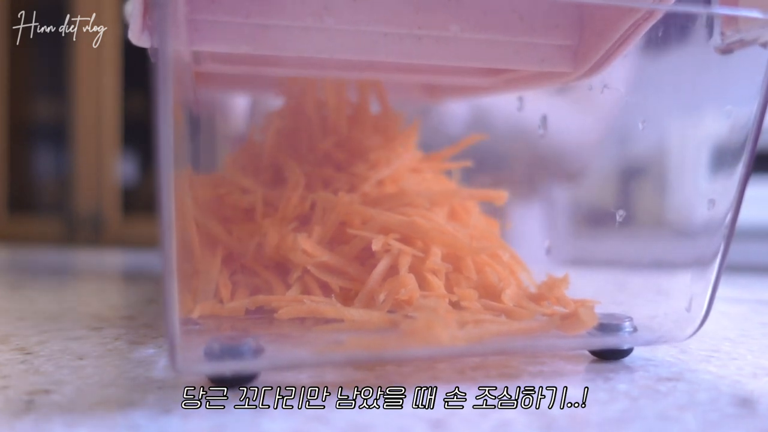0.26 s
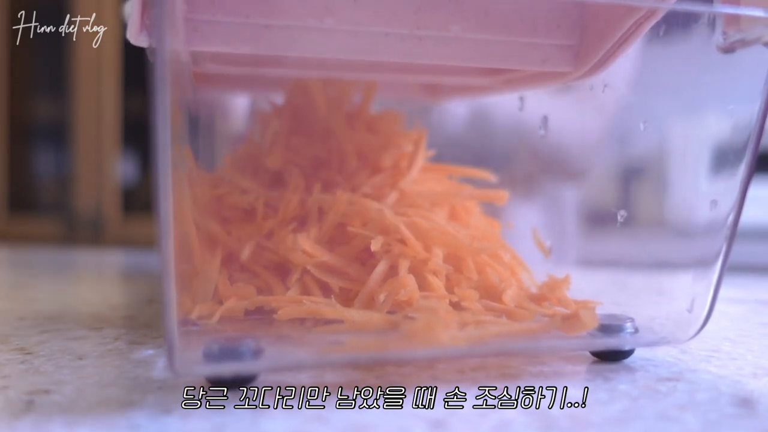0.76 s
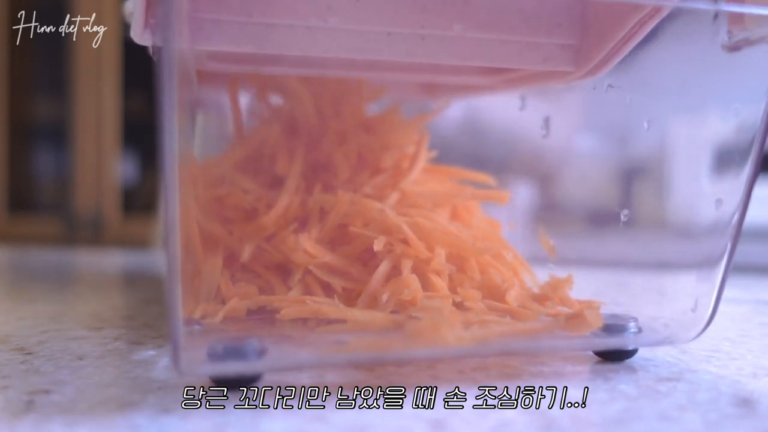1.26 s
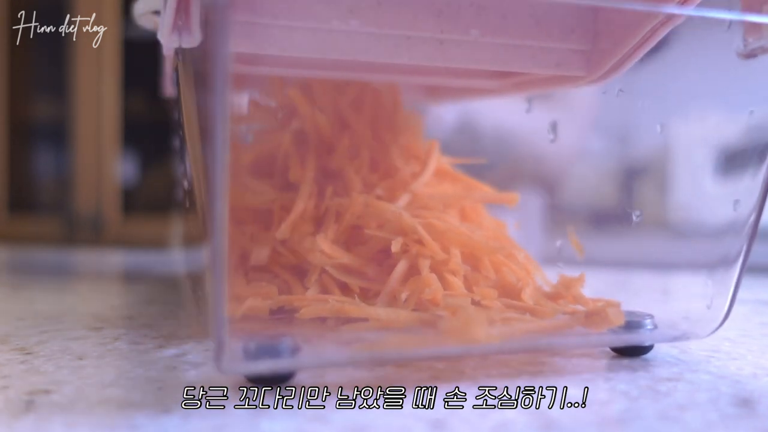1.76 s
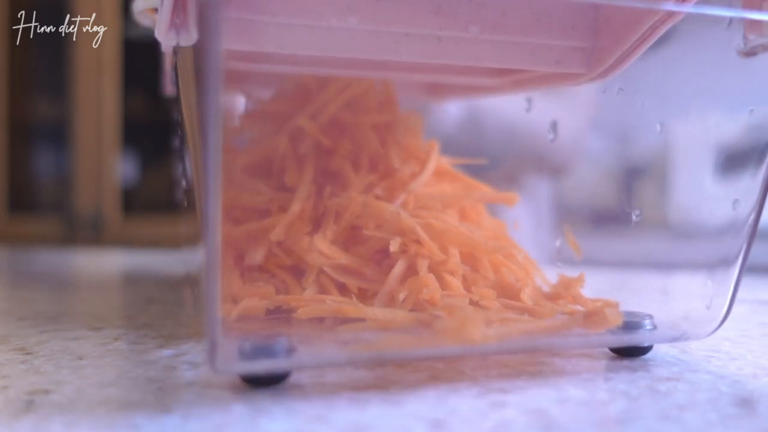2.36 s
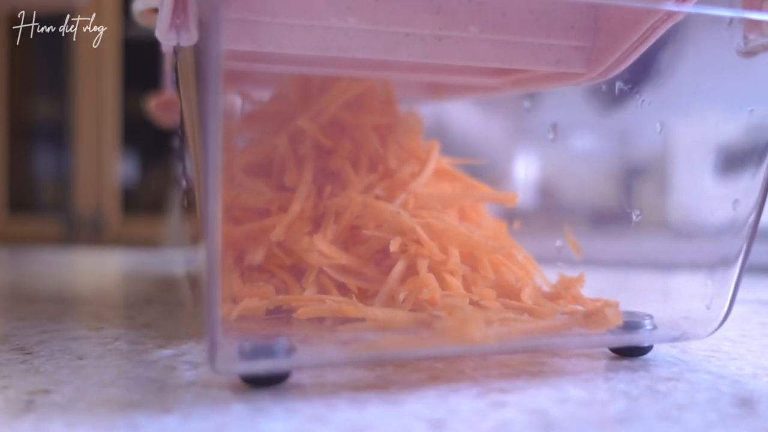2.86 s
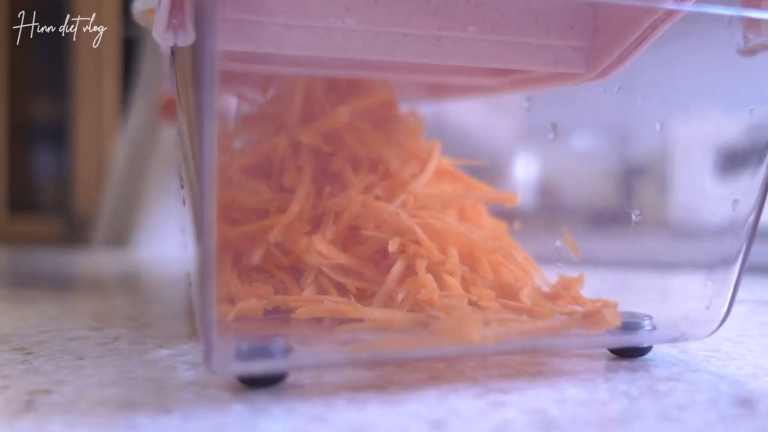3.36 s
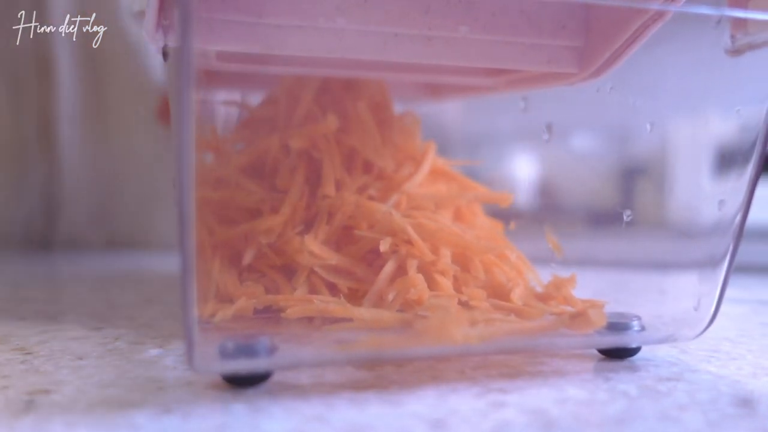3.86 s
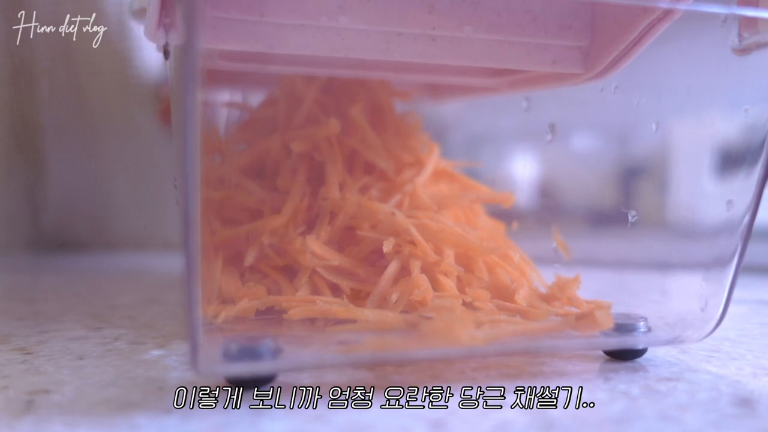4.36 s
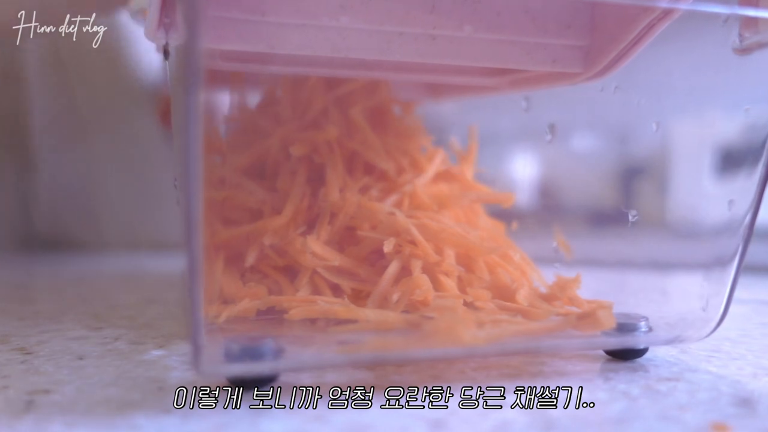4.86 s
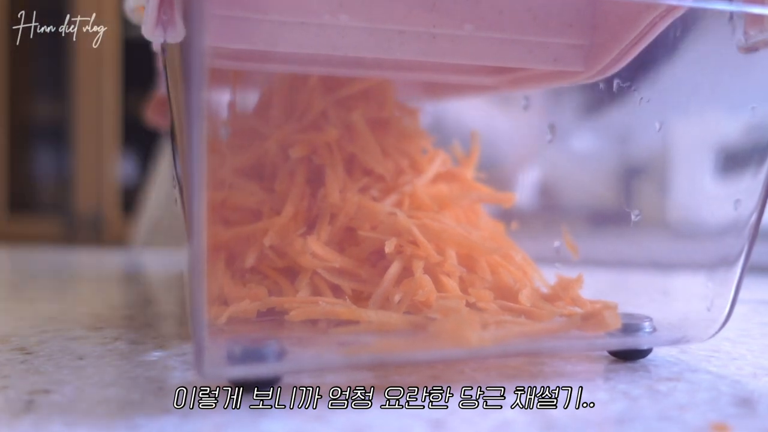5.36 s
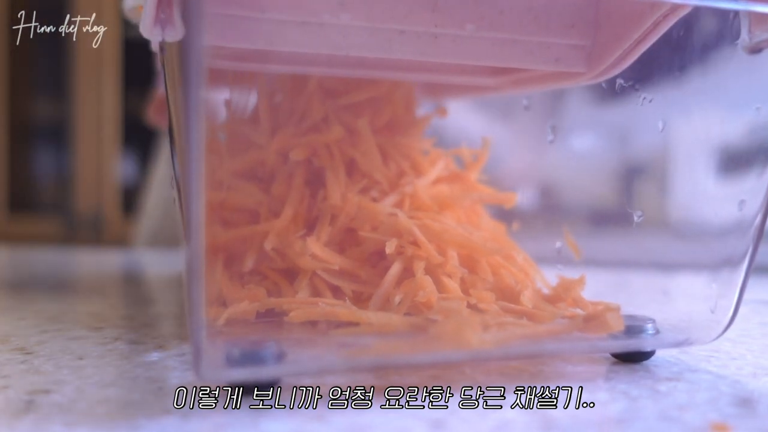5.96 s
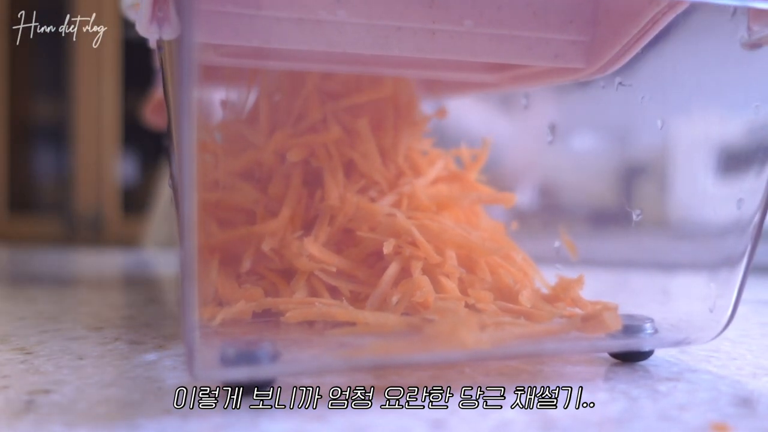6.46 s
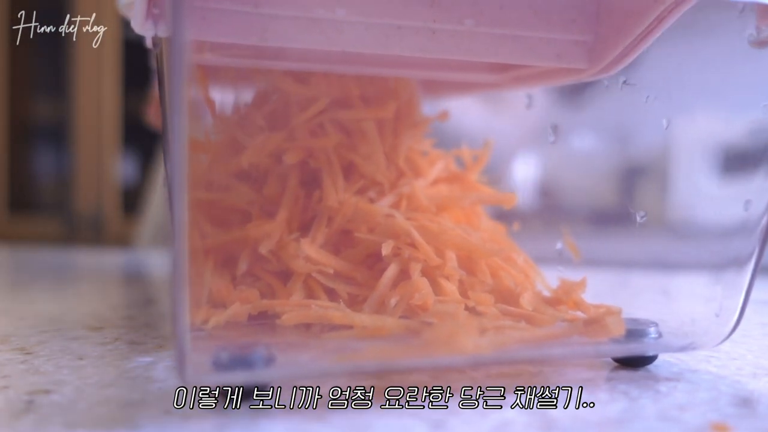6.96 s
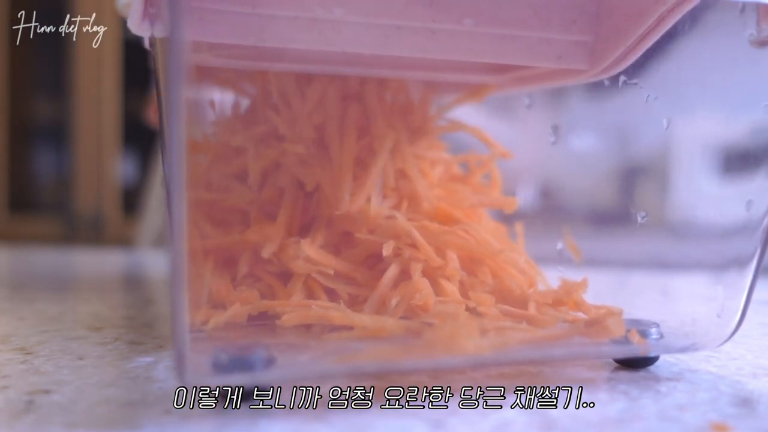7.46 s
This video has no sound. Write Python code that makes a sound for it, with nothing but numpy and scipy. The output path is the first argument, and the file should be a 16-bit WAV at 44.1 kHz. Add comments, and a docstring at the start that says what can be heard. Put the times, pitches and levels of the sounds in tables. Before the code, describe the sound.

A raw carrot rasps and snaps in rapid jerks over a plastic slicer on a hollow box, with short pauses and faint kitchen hum.

```python
"""Close to the microphone, a raw carrot rasps and snaps over the blades of a plastic slicer on a clear box.
It is pushed back and forth in jerks: each slide tears a run of cells (a rasp), and strips break off or
the carrot jumps onto a blade (a snap). Chance clicks and noise ring the plastic plate's resonances.
Wet strips tick faintly; decaying noise echoes give the short tail of the box and the kitchen.
Behind lie soft air noise, shaped by frequency, and an appliance's faint hum of wandering tones."""
import sys
import numpy as np
from scipy import signal
from scipy.fft import rfft, irfft
from scipy.io import wavfile
from scipy.ndimage import uniform_filter1d, minimum_filter1d

SR = 44100
rng = np.random.default_rng(int(sys.argv[2]) if len(sys.argv) > 2 else 0)


def store_wav(level_fs):
    """Save 16-bit WAV to argv[1]."""
    pcm = np.round(np.clip(np.atleast_2d(level_fs), -1, 1) * 32767)
    wavfile.write(sys.argv[1], SR, pcm.T.astype(np.int16))


N = 339570

# resonances of the unloaded slicer plate on its box, before the carrot shifts and favours them:
# (frequency [Hz], width [Hz], level [dB])
PLATE_RESONANCES = [(237, 23, -27), (401, 79, -15.5), (598, 146, -5), (771, 97, -9.5), (940, 154, -3.5),
                    (1092, 247, -2.5), (1243, 350, -3), (1692, 250, -8), (1700, 160, -12),
                    (2042, 274, -0.8), (2186, 220, -1.66), (2487, 300, -0.5), (2807, 74, -2.5),
                    (3630, 1190, -6), (3780, 150, -2), (4137, 450, -6), (5240, 520, -24.5),
                    (6627, 637, -11), (8590, 1270, -22), (9720, 1300, -23.5), (10830, 1170, -18),
                    (12100, 690, -20.5), (13950, 650, -45), (14800, 5800, -23.5)]
RING = 4096  # samples in the plate's filter
FREQ = np.maximum(np.fft.rfftfreq(RING, 1 / SR), 1)  # Hz


def undb(db):
    """Decibels to gain."""
    return 10 ** (np.asarray(db) / 20)


def unit(x):
    """The same sound at rms 1."""
    return x / np.sqrt(np.mean(x ** 2))


def add(out, x, start):
    """Mix x into out from sample start on."""
    first, last = max(start, 0), min(start + len(x), len(out))
    if last > first:
        out[first:last] += x[first - start:last - start]


def colour(x, points):
    """Filter by (frequency [Hz], level [dB]) points joined on a log-frequency axis."""
    hz, db = np.transpose(points)
    freq = np.maximum(np.fft.rfftfreq(len(x), 1 / SR), 1)
    gain = undb(np.interp(np.log(freq), np.log(hz), db))
    return irfft(rfft(x) * gain, len(x))


def walk(rate):
    """Slow chance: random levels, rate a second, joined by lines."""
    at = np.arange(N) / SR * rate
    return np.interp(at, np.arange(N), rng.standard_normal(N))


def appliance_hum():
    """Steady tones whose added random strength and phase widen each spectral line."""
    # hum and whine: (frequency [Hz], width [Hz], level [dB], unsteadiness [ratio to the steady part])
    hum_lines = [(479, 7, -68, 0.46), (755, 26, -73.5, 1), (2640, 38, -83, 1), (4030, 160, -78.5, 3.3),
                 (11418, 220, -81, 4.2)]
    t = np.arange(N) / SR
    hum = np.zeros(N)
    for hz, width, db, unsteady in hum_lines:
        wander = walk(2 * width) + 1j * walk(2 * width)
        line = np.real((1 + unsteady * wander) * np.exp(2j * np.pi * hz * t))
        hum += undb(db) * unit(line)
    return hum


def kitchen(air_db=-62, hum_side_db=-11):
    """Soft, diffuse air noise with the unsteady hum and whine of an appliance, in left and right."""
    # relative spectrum of the kitchen air: (frequency [Hz], level [dB per Hz])
    air_spectrum = [(20, -28), (60, -17), (160, -40), (235, -15), (320, -11.5), (420, -2.5), (600, -2),
                    (950, -2), (2000, -7.5), (3300, -10.5), (4200, -11.5), (7700, -19), (12500, -23),
                    (16000, -18.5)]
    # its width: (frequency [Hz], side minus mid [dB])
    air_width = [(100, -9), (550, -10), (1100, -7), (2500, -6.5), (4000, -6.5), (5800, -2), (8000, -6),
                 (15000, -6)]
    air_mid = unit(colour(rng.standard_normal(N), air_spectrum))
    air_side = unit(colour(rng.standard_normal(N), air_spectrum))
    sides = np.array([[1], [-1]])  # left, right
    waver_db = .5 * walk(4)
    air = undb(air_db + waver_db) * (air_mid + colour(air_side, air_width) * sides)
    return air + appliance_hum() + undb(hum_side_db) * appliance_hum() * sides


def plate(body_db, bite_db, crisp_db, contact, travel_s,
          contact_db=2.5, thud_db=-41.5, deep_share=0.92, load=0.023):
    """The plate's answer to one tiny break; the carrot's place and weight favour and shift its resonances."""
    power = undb(thud_db) ** 2 / (1 + (25 / FREQ) ** 2)
    for (free_hz, width, db), share, shift in zip(PLATE_RESONANCES, contact, contact[::-1]):
        hz = free_hz * np.exp(load * shift)
        detuning = (FREQ - hz ** 2 / FREQ) / width
        power = power + undb(db + contact_db * share) ** 2 / (1 + detuning ** 2) ** 2
    middle = (FREQ > 1700) & (FREQ < 4600)  # the band that sets the level
    gain = np.sqrt(power / np.mean(power * middle))
    # a heavy push flexes the plate and adds body; a clean cut adds bite and crispness
    tilt_hz = [200, 700, 950, 1250, 1850, 2600, 3400, 4400, 6000]
    tilt_db = [0, deep_share * body_db, body_db, body_db, 0, 0, bite_db, bite_db, crisp_db]
    gain = gain * undb(np.interp(FREQ, tilt_hz, tilt_db))
    # a struck body rings only after the blow: minimum phase
    cepstrum = irfft(np.log(gain + 1e-9))
    cepstrum[1:RING // 2] *= 2
    cepstrum[RING // 2 + 1:] = 0
    # bending waves are slower at low pitch (travel_s holds at 1 kHz), so each click is a tiny falling chirp
    bending = 4 * np.pi * travel_s * np.sqrt(1000 * FREQ)
    return irfft(np.exp(rfft(cepstrum) - 1j * bending))[:RING // 2]


def clicks(per_s, spread_db):
    """Randomly timed clicks, many small and a few large, at rms 1."""
    sizes = undb(spread_db * np.minimum(rng.exponential(size=N), 4))
    happens = rng.random(N) < per_s / SR
    return unit(happens * rng.choice([-1, 1], N) * sizes)


def rasps(cells_per_s=5000, spread_db=5.0, juice_db=-11, judder_db=2, bite_share=0.25,
          fibres_per_s=110, fibre_db=-7):
    """Slides burst unequal cells and a few tough fibres, over the smooth hiss of wet flesh on plastic."""
    # jerks of the carrot over the blades: (start [s], length [s], level [dB],
    # body near 1 kHz [dB], crispness above 5 kHz [dB])
    jerks = [(0.005, 0.03, -35.5, -3.5, 7.5), (0.094, 0.01, -49, -9, -1), (0.132, 0.018, -58, 1, -10.0),
             (0.161, 0.036, -51, 0, -5), (0.234, 0.045, -41.5, -4.5, 5.5), (0.327, 0.0088, -46.5, -8, 2.5),
             (0.357, 0.0061, -28, -11, 4), (0.417, 0.034, -51, -11, 4.5), (0.463, 0.028, -36.5, -6, 4),
             (0.53, 0.0043, -32, -6.5, 4), (0.564, 0.049, -37, -6, 4.5), (0.586, 0.016, -32, -8, 3),
             (0.606, 0.06, -53, -5, 7), (0.649, 0.078, -47, -8, -1), (0.704, 0.013, -34, -5, 9),
             (0.74, 0.008, -46, -6, 8), (0.804, 0.028, -42.5, -9, 5), (0.864, 0.021, -31.5, -9, 5.5),
             (0.936, 0.028, -42, -7, 1.5), (0.973, 0.073, -32, -4, 4.5), (1.045, 0.097, -37.5, -3, 6),
             (1.096, 0.0081, -42, -1, 14), (1.16, 0.029, -49.5, -1, 2), (1.205, 0.021, -27, -6, 2),
             (1.274, 0.062, -42, -1, 6.5), (1.354, 0.052, -36.5, -4, 6.5), (1.42, 0.017, -36, -2.5, 10.5),
             (1.507, 0.01, -50, -2, 7), (1.524, 0.028, -45.5, -4, -6), (1.559, 0.043, -35.5, -0.5, 7.5),
             (1.639, 0.012, -39.5, -3, 3), (1.658, 0.047, -35, -1, 7), (1.746, 0.024, -41.5, -9, 4.5),
             (1.777, 0.013, -37.5, 3, 12), (1.819, 0.014, -43.5, -5, 3), (1.905, 0.026, -39.5, -2, 2),
             (1.953, 0.02, -38, -2, 6), (1.985, 0.031, -33.5, -5.5, 5.5), (2.023, 0.05, -42, -1, 4),
             (2.076, 0.044, -52, -1, 6.5), (2.154, 0.017, -25.5, -11, 1.5), (2.957, 0.0087, -55, -10, -3),
             (3.046, 0.046, -51, -7, -6), (3.23, 0.0066, -46, 3, -5), (3.249, 0.053, -42.5, -1.5, 5),
             (3.282, 0.0053, -42, -2, 9), (3.321, 0.012, -38.5, -8, 5.5), (3.385, 0.03, -39.5, -5.5, 4),
             (3.719, 0.028, -54, -1, -7), (3.885, 0.01, -43, 5.5, 4.5), (3.92, 0.014, -49.5, 5.5, 5),
             (3.944, 0.023, -39, -4, 8.5), (3.997, 0.083, -48.5, -3, 6), (4.053, 0.052, -51.5, 5.5, 1),
             (4.095, 0.012, -34.5, -8, 7.5), (4.228, 0.032, -50, 3, 5), (4.265, 0.026, -40, -5, 1.5),
             (4.305, 0.049, -45.5, -7, 6.5), (4.465, 0.015, -35.5, -7.5, 6), (4.507, 0.084, -45, -1.5, 4.5),
             (4.585, 0.0083, -40, -3, 4), (4.61, 0.013, -38.5, 3, 5), (4.647, 0.013, -25, -13, -2),
             (4.699, 0.073, -43.5, -6, 2.5), (4.785, 0.019, -46, -12, 4), (4.835, 0.052, -53, -10, 3),
             (4.929, 0.036, -50, -8, 0), (5.102, 0.014, -58, 2, -1), (5.157, 0.0065, -56.5, 5, 7),
             (5.173, 0.035, -45.5, -0.5, 5), (5.243, 0.0072, -31.5, -12, 3.5),
             (5.278, 0.0072, -34.5, -3.5, 8), (5.339, 0.065, -40.5, -7, 4.5),
             (5.414, 0.047, -37, -1.5, 2.5), (5.503, 0.011, -33, -3.5, 7.5), (5.635, 0.017, -51, 8, 11),
             (5.659, 0.016, -37.5, -8.5, 7.5), (5.727, 0.033, -47.5, -2, 3.5), (5.737, 0.056, -52.5, 3, 7),
             (5.811, 0.099, -44, 0.5, 7), (5.845, 0.019, -39, -8, 9.5), (5.913, 0.022, -38.5, 4.5, -1),
             (5.948, 0.018, -34, -6.5, 5), (6.032, 0.011, -37, 2, 7), (6.077, 0.02, -47.5, -4, 7),
             (6.164, 0.012, -56, 6, -8), (6.244, 0.016, -47, -2.5, -7), (6.535, 0.039, -41.5, -4, 7),
             (6.568, 0.089, -44.5, 1, 9.5), (6.685, 0.013, -33.5, -15, 3.5), (6.721, 0.02, -31.5, -7, 5),
             (6.763, 0.036, -39, -12, 3), (6.813, 0.025, -36.5, -1.5, 6), (6.968, 0.015, -46, -4, 7),
             (7.008, 0.035, -38, -4.5, 9), (7.069, 0.072, -42.5, 0.5, 8.5), (7.131, 0.015, -35.5, -9, 5.5),
             (7.195, 0.0064, -36, -13, 1), (7.233, 0.03, -37, -3, 9.5), (7.289, 0.084, -44, -0.5, 11),
             (7.328, 0.1, -45, 1, 6), (7.365, 0.015, -33, -17, -2), (7.438, 0.053, -36.5, 0.5, 6),
             (7.52, 0.019, -43, -7, 5.5), (7.555, 0.031, -38, 1.5, 10), (7.603, 0.018, -46, -7, 12.5),
             (7.638, 0.021, -39, 3, 12), (7.68, 0.0041, -33.5, 2, 4.5)]
    # a slide gathers speed over a fixed time plus a share of its length, holds, then sticks
    attack_s, attack_share, release_s = .003, .25, .005
    attack_curve = 0.9  # above 1 the slide would creep before it gathers speed
    cells = clicks(cells_per_s, spread_db)
    fibres = undb(fibre_db) * clicks(fibres_per_s, spread_db=3.0)
    juice = undb(juice_db) * rng.standard_normal(N)
    judder = undb(judder_db * walk(350))  # the blades catch and let go
    tearing = unit((cells + fibres + juice) * judder)
    contacts = rng.standard_normal((len(jerks), len(PLATE_RESONANCES)))
    out = np.zeros(N)
    for (start_s, length, db, body_db, crisp_db), contact in zip(jerks, contacts):
        end_s = start_s + length + 6 * release_s
        i = np.arange(max(int(start_s * SR), 0), min(int(end_s * SR), N))
        t = i / SR - start_s
        gathering = np.clip(t / (attack_s + attack_share * length), 0, 1) ** attack_curve
        speed = gathering * np.exp(-np.maximum(t - length, 0) / release_s)
        ring = plate(body_db, bite_share * crisp_db, crisp_db, contact, travel_s=0.00054)
        add(out, undb(db) * signal.fftconvolve(speed * tearing[i], ring), i[0])
    return out


def shreds(level_db=-70, count=4):
    """Wet strips shift and settle with faint ticks at a few places on the plastic."""
    out = np.zeros(N)
    for contact in rng.standard_normal((count, len(PLATE_RESONANCES))):
        ring = plate(body_db=-5.5, bite_db=-2, crisp_db=-17.5, contact=2 * contact, travel_s=0.000464)
        out += signal.fftconvolve(clicks(per_s=28, spread_db=3.5), ring)[:N]
    return undb(level_db) * unit(out)


def snaps(crumble_s=0.00077, doubling_db=13, creak_s=0.0026, creak_db=-18, release_s=.0004):
    """A strip creaks, cracks, gives way at once and crumbles on, longer in crisp breaks than dull knocks."""
    # breaks and jumps, from loud snaps to faint ticks in the pauses:
    # (time [s], level over one millisecond, before the plate [dB],
    # body near 1 kHz [dB], bite near 4 kHz [dB], crispness above 5 kHz [dB])
    breaks = [(0.0311, -22.5, 3.5, 5.5, 4), (0.129, -32, -16, -2, -16), (0.1398, -36, 0, 0, -18),
              (0.184, -28, -10, -6, -23), (0.1902, -32.5, 0, 0.5, -9), (0.3495, -22, -15, -2, -1.5),
              (0.4306, -27, -10, 3.5, 5), (0.4546, -27, 1.5, -0.5, -6), (0.487, -30, -4, 15, 6.5),
              (0.5371, -27.5, -14, 11, 0), (0.5905, -25.5, -13, 0, -8), (0.6067, -18, 1, -3, -6),
              (0.6377, -17, -5, 4.5, -0.5), (0.6761, -24.5, 11, 4, 3), (0.6832, -18, 4.5, 1, 1),
              (0.738, -24, -5, -7, 2), (0.7439, -23.5, -13, -14, 2), (0.8235, -33, -10, 8, -6),
              (0.843, -28, -2.5, 6.5, 6), (0.94, -31.5, -23, 4, -7), (1.023, -18, -2, -14, -9),
              (1.0696, -18.5, -1, 0, 1), (1.0894, -15, 6, -15, -15), (1.179, -37, -2, -4, -9),
              (1.1998, -26, -5.5, -9, -10), (1.2869, -18, -7, -2, 0), (1.2974, -15, -1.5, -14, -2),
              (1.3157, -34.5, 1, 18, 13), (1.3277, -29, 8.5, 9, 2), (1.3635, -15.5, -5, 1, 1),
              (1.3737, -9.5, -0.5, -12, -8), (1.5346, -15, -12.5, -11, -10.5), (1.598, -19, 0.5, -1, -4),
              (1.644, -31, -12, 9.5, -10), (1.6684, -18.5, -2, -7, 4), (1.6795, -12, -2.5, 3, -2),
              (1.7441, -34, -4, 6, 1), (1.831, -27.5, -4, 3, 9.5), (1.9315, -35.5, 4, 10.5, -1),
              (2.0086, -30, -22, 11, -1), (2.0194, -15, -10, 1, -3), (2.0477, -33, 2, 6, 14),
              (2.0681, -17.5, 0.5, 4.5, 0.5), (2.1106, -23, -12, 2, -1), (2.1164, -23, -3, -2, 3),
              (2.176, -30, 1, -12, -1), (2.186, -43.5, -2, 14, 20.5), (2.2155, -41.5, 0, 7, 6),
              (2.2823, -38, 6, -9, -12), (2.3244, -52.5, 12, -4, -15), (2.41, -53, 10, 7, 6),
              (2.501, -44, -0.5, 7, 1), (2.5272, -61.5, 19, 17, 28), (2.6562, -41, -12, -4.5, -8),
              (2.7878, -43, 5, -5, -3), (2.987, -38.5, -20, -17, -11), (3.0421, -38, 12, -11, -8),
              (3.089, -45, -1, -14, -6), (3.394, -30, -6, 9, 10), (3.4078, -19.5, 3, -4, -1),
              (3.4493, -40, -3, -14, 0), (3.601, -50, -8, 5, 3), (3.6856, -48.5, -10, 5, 6),
              (3.956, -30, -9, -5, 3), (4.0125, -19, -3, -4, -0.5), (4.021, -25, 6, 2, 6),
              (4.0436, -33, -4, 7, 10), (4.163, -39, -16, -4, 2), (4.2326, -35, -14, 2, 6.5),
              (4.277, -37.5, 8, 10, 17.5), (4.2972, -30.5, -4, -1, -19), (4.3172, -31, 0.5, 4, 4),
              (4.3342, -21.5, 6.5, -14, -15), (4.3517, -25.5, -7, 3.5, 1), (4.5502, -17, 3.5, 0, -2.5),
              (4.5864, -27, -5, 3, -10), (4.615, -24, -17, -2, 4.5), (4.622, -30, -11, -5, -1),
              (4.6651, -24, 10.5, -2, 5), (4.7185, -35, 8, 5, 13), (4.739, -16, 5.5, 3, -3),
              (4.7481, -28, 10, 5, -1), (4.799, -38, 5, 11.5, 10), (4.8245, -42, -6, 9, 10),
              (4.9084, -46.5, -13, 10, 13), (4.951, -27, -5, -7, -14), (4.9847, -41.5, 4, 3, 7),
              (5.0747, -40.5, 6.5, -3, -8), (5.2338, -31.5, -14, 0, -1), (5.2893, -28, 1, -11, -6),
              (5.3493, -35, -9, 2, 11.5), (5.446, -17, 0, 0.5, -4), (5.4529, -18.5, -1, 6, -12),
              (5.4753, -26.5, 0, 2.5, 5), (5.5103, -20.5, -8, -16, -10), (5.5412, -37.5, -7, 4, 4),
              (5.6456, -43.5, 2, 10.5, 2), (5.68, -22, -3, -2.5, -2), (5.7015, -37, -4, 6, 14),
              (5.7246, -33, 2.5, 7, 14), (5.7738, -14.5, -2.5, 1, -6.5), (5.8215, -28, -15, -4, 4),
              (5.8755, -22, 5.5, 0.5, 2.5), (5.9028, -28, -3, 7, -9), (6.1613, -21.5, -8.5, -9, -9.5),
              (6.3296, -49.5, 2, 6, -13), (6.3786, -40, -0.5, -3, -10), (6.607, -25, -9, 4, 4.5),
              (6.6169, -28.5, 13, 4, 5), (6.64, -23.5, -20, -3, -3), (6.6663, -17.5, 8, 4, -0.5),
              (6.731, -33, -18, -5, 3), (6.7418, -18.5, 8.5, 1, -1), (6.7921, -19, 7.5, -1.5, -1),
              (7.1003, -26, 8.5, -3, -13), (7.1091, -16.5, 6.5, -6, -6), (7.3207, -17, 2, -3, -10.5),
              (7.386, -18.5, 2.5, 2.5, 6), (7.4135, -29.5, -2, 14.5, 11.5), (7.4482, -15, -2.5, -3, -7),
              (7.66, -34.5, -7, 18.5, 15.5), (7.6644, -14.5, -19, -2, -9)]
    t = np.arange(RING // 8) / SR
    contacts = rng.standard_normal((len(breaks), len(PLATE_RESONANCES)))
    crumbs = rng.standard_normal((len(breaks), len(t)))
    gives_way = np.arange(len(t)) == int(release_s * SR)  # one sharp impulse
    out = np.zeros(N)
    for (time_s, db, body_db, bite_db, crisp_db), contact, crumb in zip(breaks, contacts, crumbs):
        # doubling_db of crispness doubles the crumbling time, at most
        decay_s = crumble_s * 2 ** min(crisp_db / doubling_db, 1)
        crumbling = crumb * t * np.exp(-t / decay_s)
        crumbling = crumbling / np.linalg.norm(crumbling)
        creak = crumb * np.exp(-t[::-1] / creak_s)  # swells up to the crack
        creak = undb(creak_db) * creak / np.linalg.norm(creak)
        force = np.concatenate([creak, crumbling + gives_way])
        force = force / np.linalg.norm(force) * np.sqrt(SR / 1000)  # energy of rms 1 over 1 ms
        ring = plate(body_db, bite_db, crisp_db, contact, travel_s=0.001155)
        start = int((time_s - release_s) * SR) - len(t)
        add(out, undb(db) * signal.fftconvolve(force, ring), start)
    return out


def reflections(t60_s, gap_s, tone):
    """Dense echoes that start after gap_s and die away, with total energy 1."""
    t = np.arange(SR // 2) / SR
    decay = np.exp(-np.log(1000) * t / t60_s)
    echoes = colour(rng.standard_normal(len(t)), tone) * decay * (t > gap_s)
    return echoes / np.linalg.norm(echoes)


def space(x, room_side_db=-31, box_db=-13, room_db=-18, side_db=-20.0):
    """The box answers at once, the kitchen more slowly; only a little differs between left and right."""
    box = reflections(t60_s=0.045, gap_s=0.0011,
                      tone=[(300, 4.0), (2500, 0.1), (8000, 3.7), (16000, 0.8)])
    room = reflections(t60_s=0.18, gap_s=0.013,
                       tone=[(300, 6), (1200, 1), (2200, -2.0), (4000, -3.0), (5500, 4.0),
                             (6700, -3.0), (8000, 5.5), (16000, -0.5)])
    across_tone = [(250, 3), (550, -9), (1000, -6), (2200, -7), (3800, -1), (5200, 9.0),
                   (7500, 6), (10500, 4.5), (13000, 6.5), (16000, 0)]
    far = reflections(t60_s=0.31, gap_s=0.006, tone=[(300, -3), (1200, -12), (4000, -2), (12000, 5.5)])
    mid = x + signal.fftconvolve(x, undb(box_db) * box + undb(room_db) * room)[:N]
    side = undb(room_side_db) * signal.fftconvolve(x, far)[:N]
    # the left-right difference changes as the carrot travels along the plate
    place = walk(9.8) * np.pi / 2
    for share in (np.cos(place), np.sin(place)):
        across = reflections(t60_s=0.029, gap_s=0.00026, tone=across_tone)
        side += undb(side_db) * signal.fftconvolve(x * share, across)[:N]
    return np.array([mid + side, mid - side])


def scene():
    """The slicer on the worktop, in the kitchen."""
    return space(rasps() + snaps() + shreds()) + kitchen()


def record(dry, ceiling_db=-11, top_hz=15750):
    """A fast limiter holds down the sharpest snaps, and the recorder cuts the top."""
    peak = np.abs(dry).max(axis=0)  # both channels share one gain
    allowed = np.minimum(1, undb(ceiling_db) / (peak + 1e-9))
    gain = uniform_filter1d(minimum_filter1d(allowed, size=45), size=45)  # about 1 ms
    low_pass = signal.ellip(10, .2, 70, top_hz, fs=SR, output="sos")
    return signal.sosfilt(low_pass, dry * gain)


dry = scene()
out = record(dry)
store_wav(out)
```